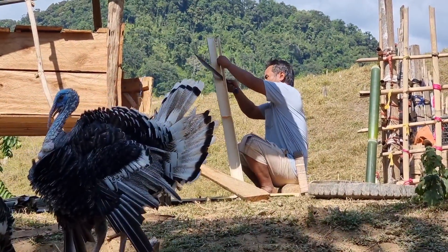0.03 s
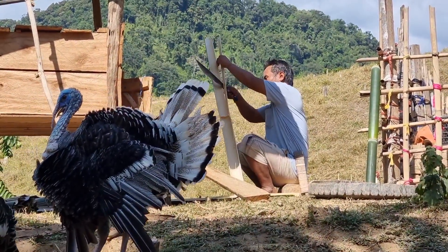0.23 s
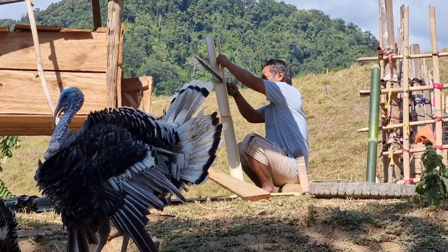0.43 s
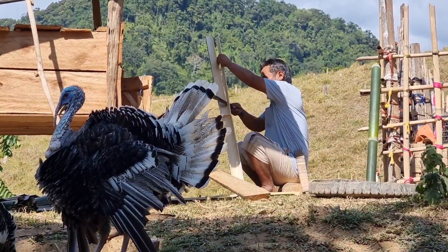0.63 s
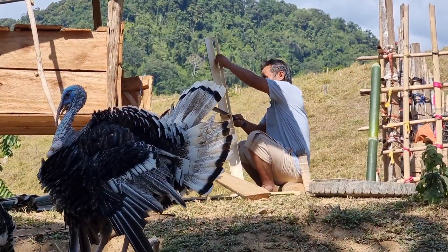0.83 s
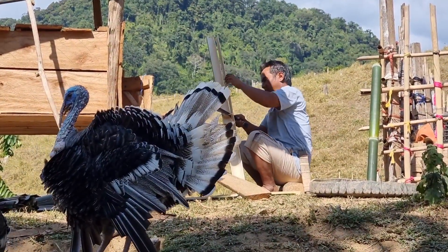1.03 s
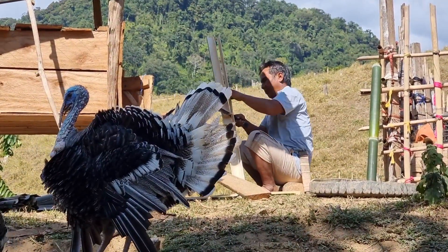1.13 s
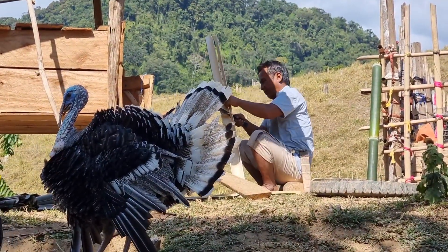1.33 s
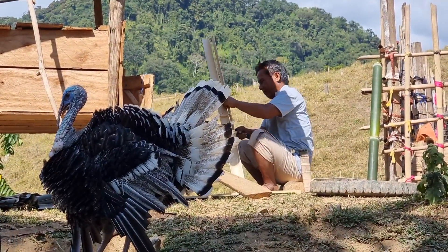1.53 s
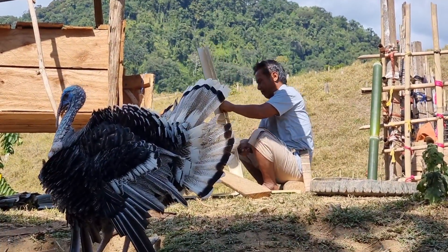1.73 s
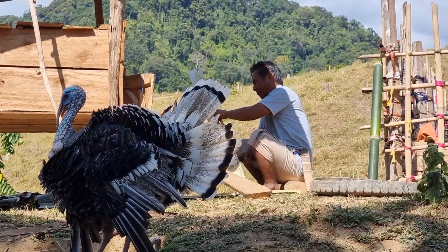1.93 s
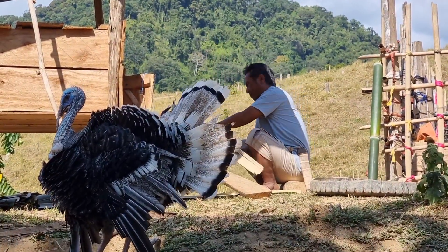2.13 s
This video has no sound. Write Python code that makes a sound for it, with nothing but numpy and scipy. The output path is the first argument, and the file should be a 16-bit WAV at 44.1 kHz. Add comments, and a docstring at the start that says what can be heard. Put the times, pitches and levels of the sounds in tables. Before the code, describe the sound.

One sharp crack of splitting bamboo rings briefly, then the knife catches on the fibres with faint scrapes and clicks. Wind buffets the microphone in the open air, while small birds chirp over a steady hiss.

```python
"""Outdoors, wind buffets two microphone ports over a steady hiss, and small birds twitter and whistle.
A knife ticks lightly in a bamboo pole. A short hiss swells just before the crack.
At about 0.7 s the knife is forced down: the wall splits with one loud crack and the pole rings briefly.
Light ticks and scrapes follow as the blade catches on the fibres.
Towards the end the wind dies down, then picks up for one last moment."""
import sys
import numpy as np
from scipy import signal
from scipy.fft import rfft, irfft
from scipy.io import wavfile
from scipy.ndimage import uniform_filter1d

SR = 44100
rng = np.random.default_rng(int(sys.argv[2]) if len(sys.argv) > 2 else 0)


def dump_mix(stems):
    """Bounce the given channels to the path in sys.argv[1] as a 16-bit WAV at rate SR."""
    frames = np.atleast_2d(stems).T  # one column per channel
    limited = np.clip(frames, -1, 1)  # hard clip at full scale
    pcm = np.round(limited * 32767).astype(np.int16)
    wavfile.write(sys.argv[1], SR, pcm)


N = 97020  # 2.2 s
TIME, FREQ = np.arange(N) / SR, np.fft.rfftfreq(N, 1 / SR)
SPLIT_S, POLE_LAG_MS = .6858, .223  # when the pole cracks; how much later the right port hears it


def amp(db):
    """Turns decibels into a number to multiply by."""
    return 10 ** (np.asarray(db) / 20)


def unit(x):
    """Scales a signal to an average power of 1."""
    return x / np.sqrt(np.mean(x ** 2) + 1e-20)


def wobble(samples):
    """A random wavering curve; more samples make it slower."""
    return unit(uniform_filter1d(rng.standard_normal(N), size=samples))


def read(points, hz, column=1):
    """Looks up a table by frequency, sliding smoothly between its rows."""
    table = np.transpose(points)
    return np.interp(np.log(hz + 1), np.log(table[0] + 1), table[column])


def colour(x, db):
    """Turns each frequency up or down, then sets the average power to 1."""
    return unit(irfft(rfft(x) * amp(db), N))


def ports(pair, likeness, lag_ms):
    """Makes left and right partly alike; the right port hears the shared part lag_ms later."""
    left, other = rfft(pair)
    delay = np.exp(-2j * np.pi * FREQ * lag_ms / 1000)
    right = likeness * left * delay + np.sqrt(1 - likeness ** 2) * other
    return irfft(np.array([left, right]), N)


# Tone of the outdoor hiss (frequency [Hz], relative level [dB])
AIR_TONE = [(60, 7.5), (200, -1.5), (380, 1), (700, -1), (1200, -0.5), (2100, -1.5), (3200, -3), (6000, -5),
            (7500, -7.5), (9500, -13), (11000, -17.5), (15500, -18)]
# Spread of the hiss (frequency [Hz], left-right likeness [0-1], left minus right [dB])
AIR_SPREAD = [(98, 0.96, -6.5), (493, 0.77, -1), (890, 0.04, 1.5), (1027, 0.93, -1), (1530, 1, -1),
              (2200, 0.74, -6), (4200, 0, -1.5), (8260, 0.36, 1.5), (15000, 0.2, -3.5)]
def air():
    """Distant outdoor hiss, drifting in faint patches."""
    grid = signal.stft(rng.standard_normal((2, N)), nperseg=512)[2]  # noise by frequency and time
    patches = uniform_filter1d(rng.standard_normal(grid.shape[1:]), size=8, axis=0)
    patches_db = 1.2 * unit(uniform_filter1d(patches, size=10, axis=1))
    noise = signal.istft(grid * amp(patches_db), nperseg=512)[1][:, :N]
    pair = ports(noise, read(AIR_SPREAD, FREQ), lag_ms=.45)
    side_db = np.array([[.5], [-.5]]) * read(AIR_SPREAD, FREQ, column=2)
    return amp(-47.5) * colour(pair, read(AIR_TONE, FREQ) + side_db)


# Tone of the wind's rumble (frequency [Hz], relative level [dB])
WIND_TONE = [(12, -25), (20, 0.5), (43, -3), (65, 2.5), (93, -7), (195, -33.5), (260, -58), (340, -40),
             (570, -120)]
# Rise and fall of the wind (time [s], level [dB])
WIND_GUSTS = [(0, -41.5), (.12, -46.5), (.3, -37.5), (.8, -34), (1.25, -38.5), (1.45, -41.5), (1.75, -44.5),
              (1.83, -52), (2.07, -51.5), (2.17, -40)]
# Single puffs (peak time [s], half-length [s], level [dB], left minus right [dB], flutter level [dB])
WIND_PUFFS = [(0.182, 0.039, -38.5, 20, -72), (0.378, 0.13, -27.5, 2.5, -68),
              (0.569, 0.0082, -22.5, 10, -56), (0.713, 0.046, -37, -1, -40), (0.991, 0.051, -31.5, 17, -64),
              (1.087, 0.075, -27.5, -2.5, -46.5), (1.214, 0.048, -29, 4.5, -45)]
def wind():
    """Swirls of air push on each port separately; puffs ride on top, some with a flutter."""
    treble_cut_db = -19 * np.log2(np.maximum(FREQ / 260, 1))
    rumble = colour(rng.standard_normal((2, N)), read(WIND_TONE, FREQ) + treble_cut_db)
    rumble /= np.sqrt(uniform_filter1d(rumble ** 2, size=4000, axis=1))  # even out its loudness
    flutter = colour(rng.standard_normal((2, N)), -27 * np.log2((FREQ + 1) / 141) ** 2)  # near 141 Hz
    gust_db = np.interp(TIME, *np.transpose(WIND_GUSTS))
    power = (amp(gust_db) * amp([[4], [1.5]])) ** 2  # stronger on the left
    flutter_gain = np.zeros((2, N))
    for peak, half_length, db, side_db, flutter_db in WIND_PUFFS:
        sides = amp(np.array([[.5], [-.5]]) * side_db)
        push = sides * np.exp(-2 * ((TIME - peak) / half_length) ** 2)
        power += (amp(db) * push) ** 2
        flutter_gain += amp(flutter_db) * push
    return rumble * np.sqrt(power) + flutter * flutter_gain


# How long the yard echoes (frequency [Hz], time to fade by 60 dB [s])
ECHO_FADE = [(200, .22), (1500, .17), (15000, .16)]
def yard_echo(sound):
    """Sound scatters off the ground and a wooden wall, leaving a short tail."""
    hz, t, grid = signal.stft(rng.standard_normal((2, SR // 2)), SR, nperseg=256)
    fade = amp(-60 * t / read(ECHO_FADE, hz)[:, None])
    build_up = np.minimum(t / .037, 1)
    tail = signal.istft(grid * fade * build_up, SR, nperseg=256)[1]
    return signal.fftconvolve(sound, tail / np.linalg.norm(tail[0]), axes=1)[:, :N]


def bird_note(start, length, first_hz, middle_hz, last_hz, db):
    """An almost pure tone that bends along one arc, wavering in pitch and loudness."""
    progress = np.clip((TIME - start) / length, 0, 1)
    bend = 2 * (2 * middle_hz - first_hz - last_hz) * progress * (1 - progress)
    hz = (first_hz + (last_hz - first_hz) * progress + bend) * (1 + .024 * wobble(60))
    from_edge_s = np.minimum(progress, 1 - progress) * length
    fade = np.sin(np.pi / 2 * np.minimum(from_edge_s / .0072, 1))
    return amp(db + 4 * wobble(130)) * fade * np.sin(2 * np.pi * np.cumsum(hz) / SR)


# Twittering notes (time [s], length [s], first pitch [Hz], middle [Hz], last [Hz], level [dB])
BIRD_CHIRPS = [(.072, .022, 5240, 4550, 4900, -42.5), (.073, .03, 5200, 6000, 6520, -44.5),
               (0.515, 0.054, 6080, 6560, 6240, -46.5), (0.593, 0.029, 6200, 5850, 5640, -44.5),
               (0.616, 0.0227, 5460, 4660, 5000, -31.5), (0.782, 0.028, 6240, 6470, 6070, -45.5),
               (0.889, 0.027, 5200, 5100, 5340, -38.5), (1.419, 0.017, 5660, 5500, 6700, -42.5),
               (1.848, 0.04, 5720, 5300, 5500, -47.5), (1.885, 0.022, 5000, 5680, 4870, -42.5),
               (1.987, 0.048, 5920, 6010, 5530, -44)]
# Quick falling peeps (time [s], first pitch [Hz], level [dB])
BIRD_PEEPS = [(.016, 5330, -42.5), (.033, 4900, -42.5), (.536, 6770, -42), (.771, 6020, -41.5),
              (.812, 5350, -35), (.925, 6120, -40), (1.043, 5400, -46.5), (1.308, 5470, -47),
              (1.376, 4900, -45), (1.58, 4900, -38.5), (1.629, 5080, -43), (1.689, 5700, -43),
              (1.769, 6600, -43)]
# Longer falling whistles (time [s], length [s], level [dB])
BIRD_WHISTLES = [(0.3, 0.089, -60), (0.998, 0.23, -64), (2.15, 0.16, -61.5)]
def birds():
    """One bird twitters and a second whistles faintly, both to the right and echoing in the yard."""
    twitter = sum(bird_note(*row) for row in BIRD_CHIRPS)
    twitter += sum(bird_note(start, .0164, hz, .93 * hz, .82 * hz, db) for start, hz, db in BIRD_PEEPS)
    twitter = ports(np.array([twitter, twitter]), likeness=.99, lag_ms=-.13)
    whistles = sum(bird_note(start, length, 4060, 3890, 3560, db) for start, length, db in BIRD_WHISTLES)
    song = twitter * amp([[-9.5], [0]]) + whistles * amp([[0], [4]])
    return song + amp(-8) * yard_echo(song)


# Tone of the hiss just before the crack (frequency [Hz], relative level [dB])
SWELL_TONE = [(300, -7), (2000, 2.5), (5000, 5), (7500, -4.5), (11000, -3), (15500, 0)]
def hiss_swell():
    """A brief gritty hiss swells just before the crack."""
    grit = amp(2.5 * wobble(100))
    hiss = colour(grit * rng.standard_normal((2, N)), read(SWELL_TONE, FREQ))
    lead_s, rise_s = .054, .04
    swell = np.clip((TIME - SPLIT_S + lead_s) / rise_s, 0, 1) * (TIME < SPLIT_S)
    return amp(-29.5) * hiss * swell


def crackle(per_second):
    """Many tiny breaks in the bamboo, each one a click at a random moment."""
    clicks = rng.standard_normal((2, N)) * (rng.random((2, N)) < per_second / SR)
    return ports(clicks, likeness=.4, lag_ms=POLE_LAG_MS)


def burst(start, rise_s, hold_s, fade_s):
    """A loudness curve that rises, holds, then drops 60 dB every fade_s."""
    t = TIME - start
    return np.clip(t / rise_s, 0, 1) * amp(-60 * np.maximum(t - rise_s - hold_s, 0) / fade_s)


# Strokes of the blade (time [s], length [s], level [dB])
BLADE_STROKES = [(1.12, 0.017, -50.5), (1.489, 0.11, -45.5), (1.607, 0.19, -52), (1.772, 0.046, -48.5)]
# Tone of the scraping (frequency [Hz], relative level [dB])
SCRAPE_TONE = [(200, -17), (900, -13), (2000, 7), (3000, -2), (4000, 7), (5000, -4), (7000, 0),
               (10000, -12), (15500, -8)]
def scrapes():
    """The edge catches fibre after fibre under each stroke, in uneven clumps."""
    pressure = np.zeros(N)
    for start, length, db in BLADE_STROKES:
        position = 2 * (TIME - start) / length - 1  # -1 to 1 during the stroke
        pressure += amp(db) * np.sqrt(np.maximum(1 - position ** 2, 0))
    clumps = amp(3 * wobble(400))
    return pressure * colour(clumps * crackle(per_second=2500), read(SCRAPE_TONE, FREQ))


# Blade ticks and knocks (time [s], level [dB], pitch [Hz], width [octaves], time to fade by 60 dB [s])
BLADE_TICKS = [(0.13, -44, 2750, 0.53, 0.058), (0.208, -40.5, 2620, 0.76, 0.049),
               (0.215, -44, 4970, 0.58, 0.046), (.994, -44.5, 4700, 0.47, 0.076),
               (1.483, -43, 540, 0.75, 0.083), (1.789, -41, 3350, 0.87, 0.047),
               (1.968, -37.5, 4800, 0.63, 0.037), (1.9788, -36, 3860, 0.68, 0.057),
               (1.995, -32.5, 3150, 0.13, 0.021)]
def ticks():
    """Each tick is a small cluster of breaks with its own brightness."""
    out = np.zeros((2, N))
    for start, db, hz, width, fade_s in BLADE_TICKS:
        octaves = np.log2((FREQ + 1) / hz)
        peak = np.exp(-.5 * (octaves / width) ** 2)
        wide_base = amp(-21) / (1 + .5 * octaves ** 2)
        breaks = colour(crackle(per_second=14000), 20 * np.log10(peak + wide_base))
        out += amp(db) * breaks * burst(start, rise_s=.002, hold_s=.0014, fade_s=fade_s)
    return out


# The pole's natural tones (pitch [Hz], relative level [dB], time to fade by 60 dB [s])
POLE_TONES = [(690, -17, .08), (1850, -4, .1), (2424, 1, .07), (2740, -1, .06), (2810, -1, .07),
              (2945, -3, .07), (3050, -2, .08), (3350, -2, .09), (3835, -4, .085), (4455, -1, .09),
              (4680, -2, .09), (4815, -2, .09), (5626, -5, .09), (6448, -3, .08), (6760, -4, .08),
              (9280, -1, .07)]
def with_pole_ring(jolts):
    """Each jolt sets the hollow pole ringing; returns the jolts and the ringing together."""
    t = TIME[:SR // 4]
    tones = sum(amp(db - 60 * t / fade_s) * np.sin(2 * np.pi * (hz * t + rng.random((2, 1))))
                for hz, db, fade_s in POLE_TONES)
    ringing = signal.fftconvolve(jolts, tones / np.linalg.norm(tones[0]), axes=1)[:, :N]
    return jolts + amp(-15.5) * ringing


# Tone of the breaking fibres (frequency [Hz], relative level [dB])
FIBRE_TONE = [(100, 4.5), (250, -6.5), (420, -24.5), (720, -6), (1250, -19), (2050, 3), (2450, 6),
              (3600, -0.5), (4600, -2), (6500, 1.5), (7700, -6.5), (9300, -6), (12000, -1), (15500, -17)]
def split():
    """The bamboo wall gives way with a snap, and fibres break in a quick burst behind it."""
    t = TIME - SPLIT_S - np.array([[0], [POLE_LAG_MS / 1000]])
    snap_hz, half_length_s = 3900, .00022
    snap = amp([[-1], [-4]]) * np.exp(-(t / half_length_s) ** 2) * np.cos(2 * np.pi * snap_hz * t)
    fibres = colour(crackle(per_second=14000), read(FIBRE_TONE, FREQ))
    return snap + amp(-15) * fibres * burst(SPLIT_S - .001, rise_s=.001, hold_s=.0056, fade_s=.055)


def scene():
    """Hiss swell, crack, ticks and scrapes with their echo, plus birds, outdoor hiss and wind."""
    knife = with_pole_ring(split() + ticks()) + scrapes()
    foreground = knife + hiss_swell()
    return foreground + amp(-20.5) * yard_echo(foreground) + birds() + air() + wind()


def record(dry):
    """Cuts the highest treble, above 15550 Hz."""
    low_pass = signal.firwin(301, 15550, window=("kaiser", 9), fs=SR)
    return signal.oaconvolve(dry, low_pass[None], "same")


dry = scene()
out = record(dry)
dump_mix(out)
```